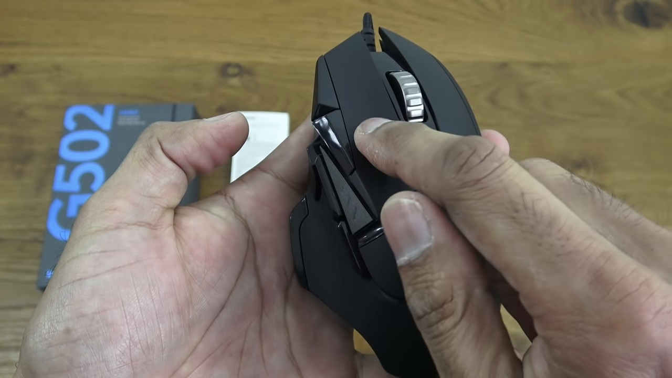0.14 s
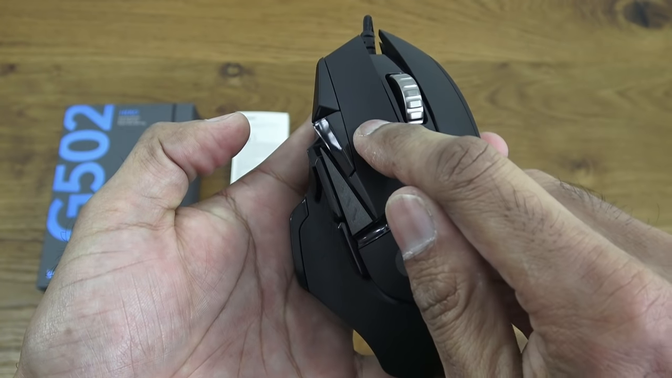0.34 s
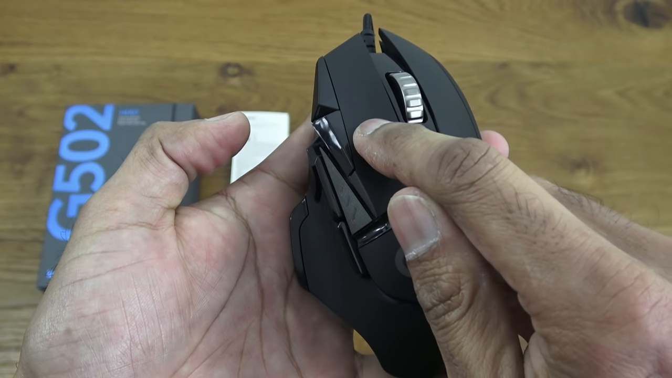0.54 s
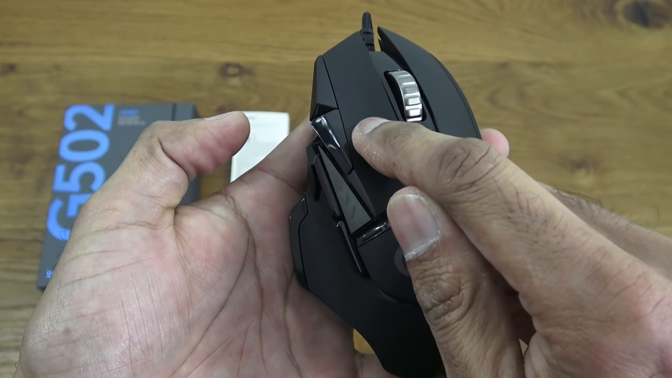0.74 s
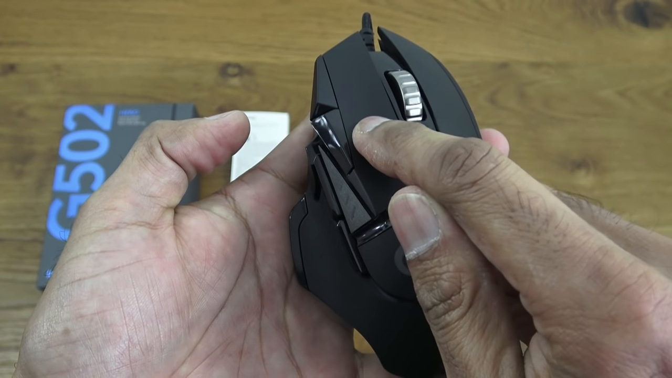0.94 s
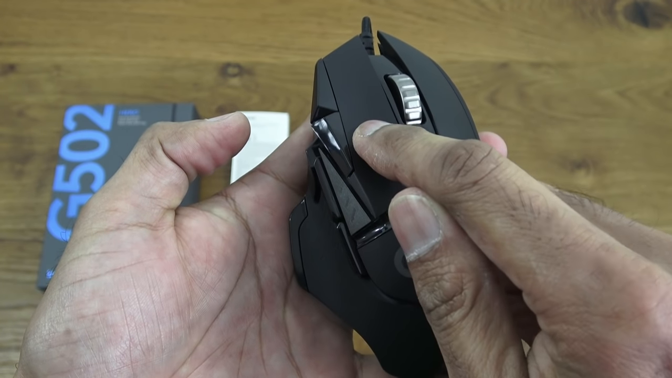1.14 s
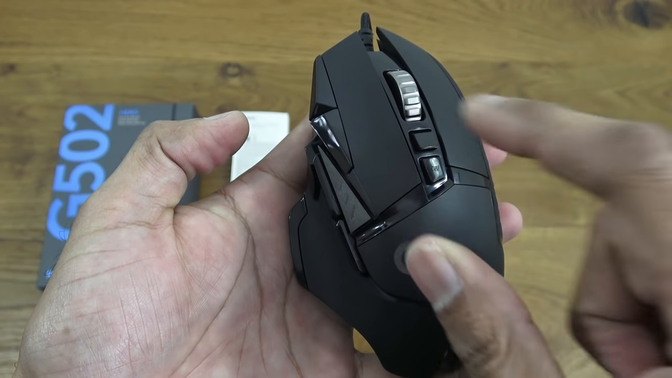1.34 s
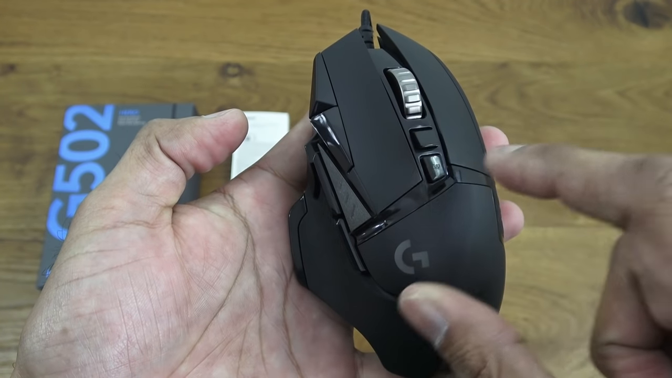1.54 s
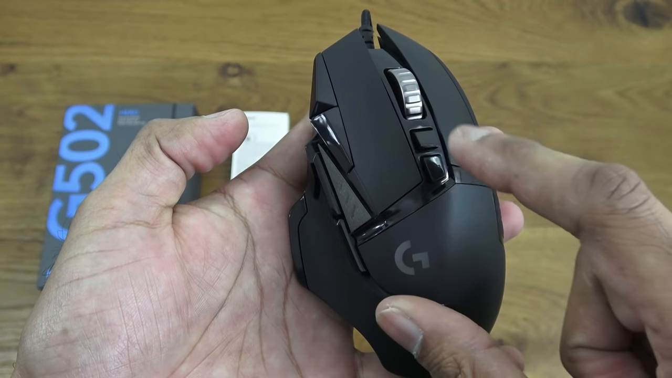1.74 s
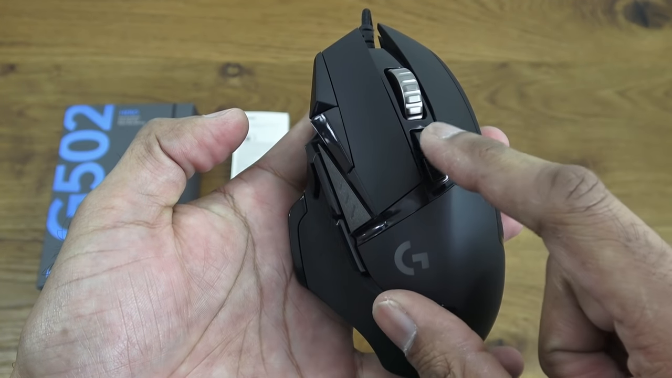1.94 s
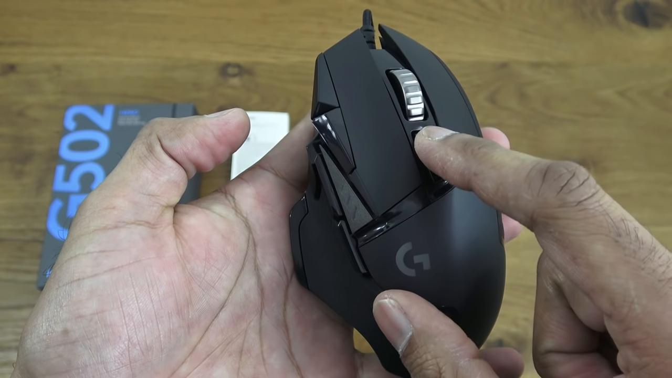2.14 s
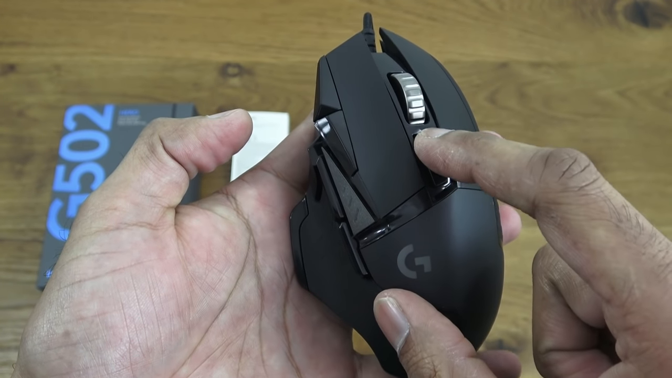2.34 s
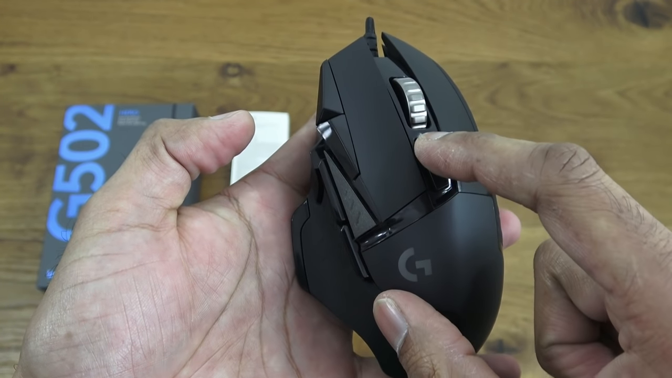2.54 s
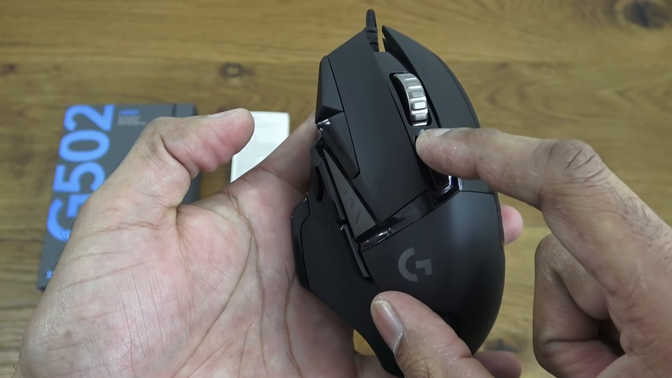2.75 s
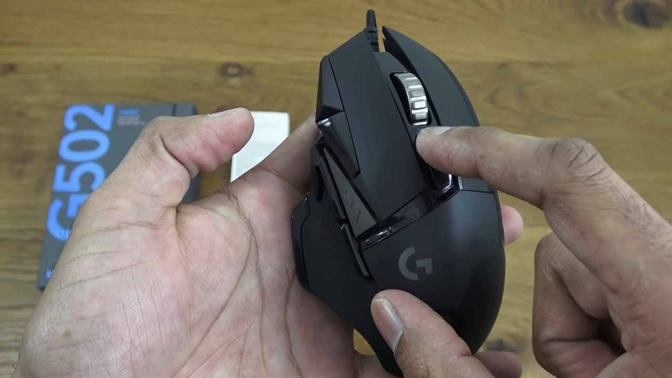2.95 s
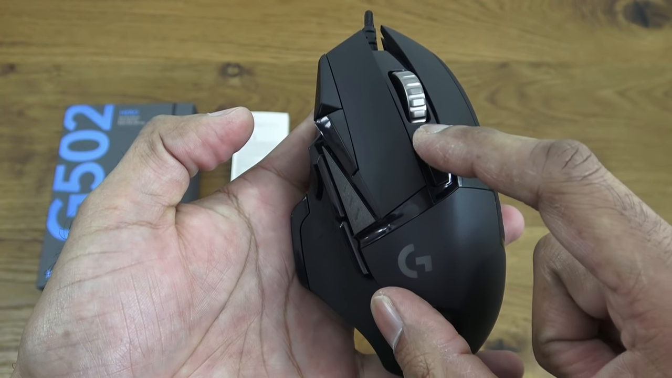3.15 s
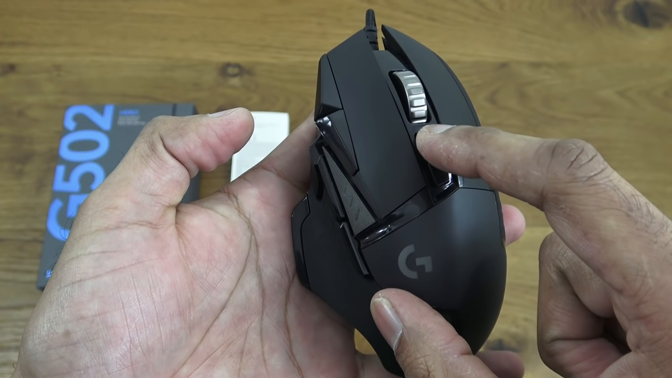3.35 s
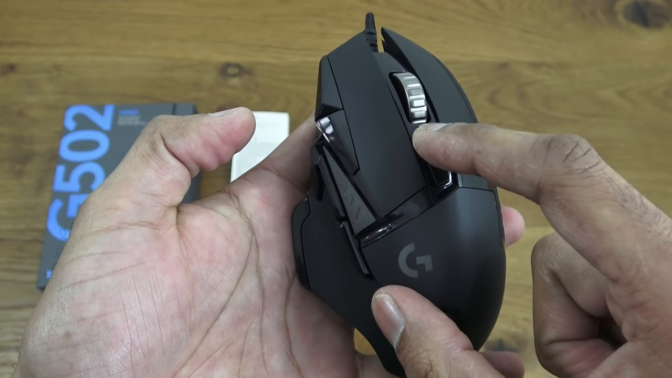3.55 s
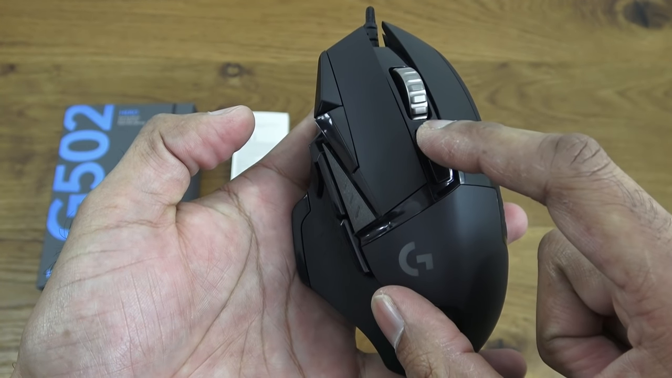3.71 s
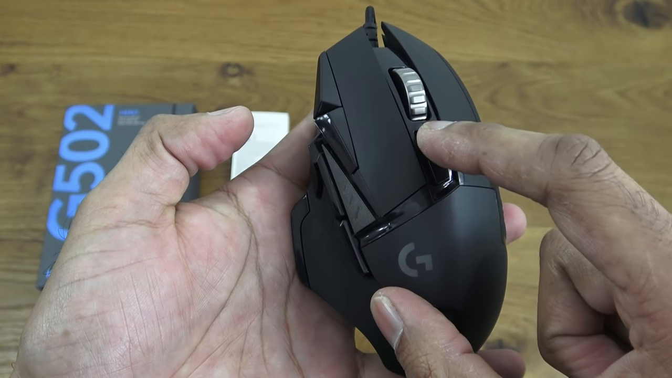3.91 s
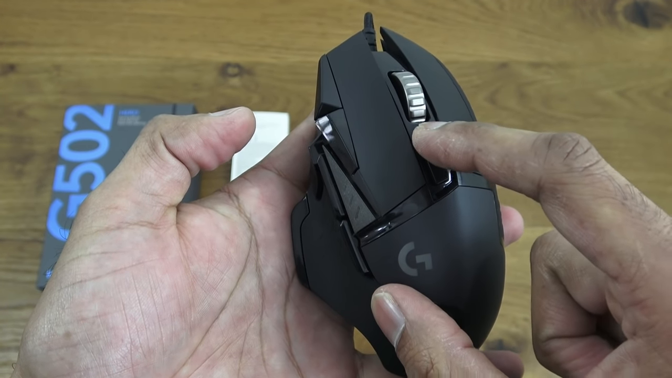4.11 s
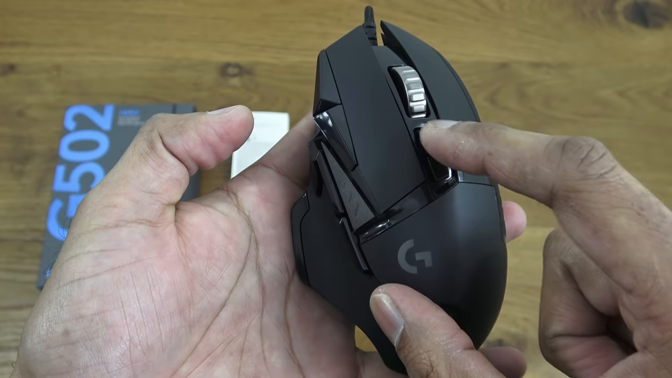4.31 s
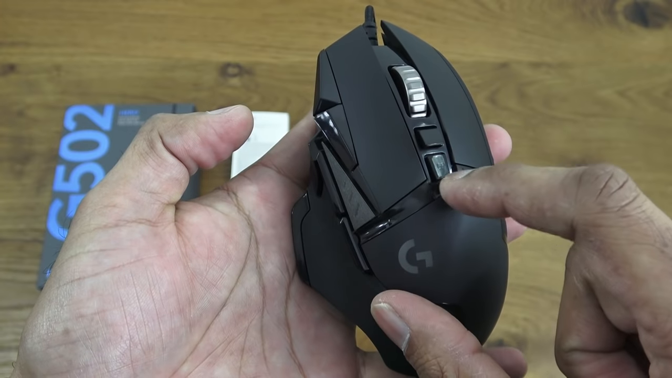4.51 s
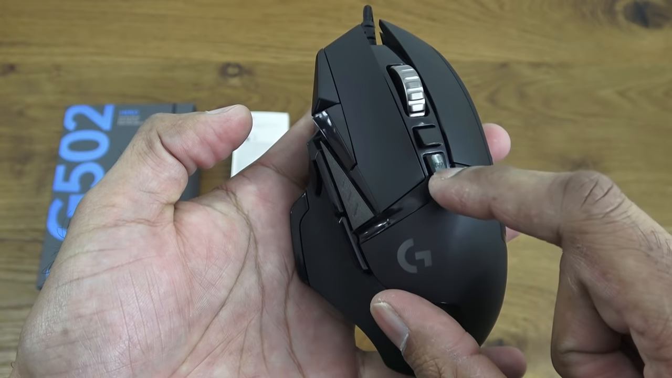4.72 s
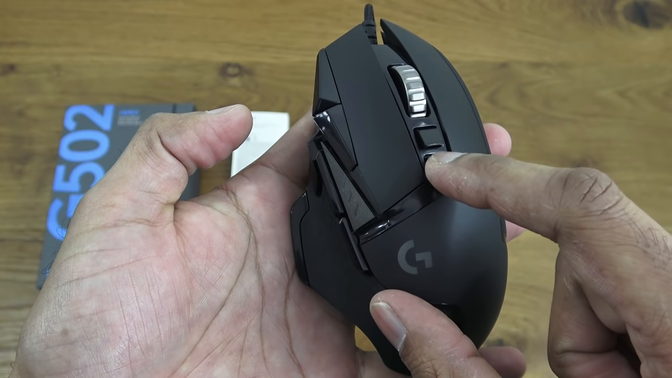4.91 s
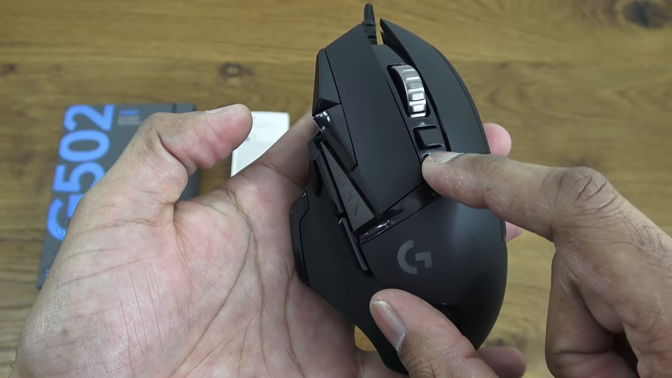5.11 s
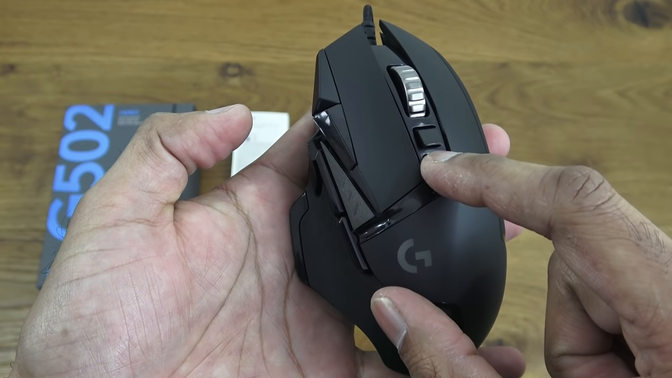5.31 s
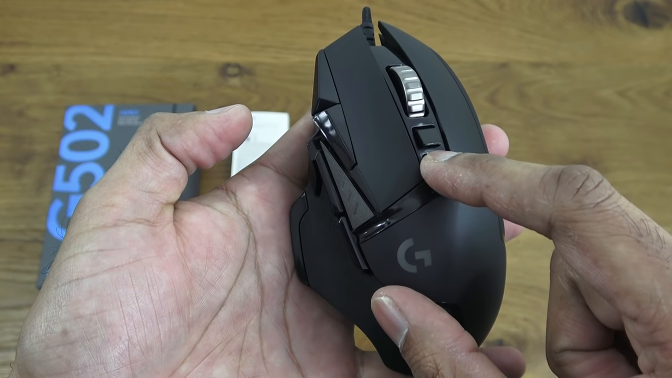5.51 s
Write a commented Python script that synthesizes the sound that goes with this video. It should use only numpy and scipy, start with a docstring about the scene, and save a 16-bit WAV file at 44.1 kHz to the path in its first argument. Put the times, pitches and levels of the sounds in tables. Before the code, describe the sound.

A computer mouse button clicks four times, its wheel latch clacks sharply in and out, and a smaller button ticks once.

```python
"""A computer mouse is held over a wooden desk in a small quiet room, and its buttons are tried one by one.
A fingertip lands, the main button's microswitch ticks down and up four times, and the finger slides off.
Then the stiff latch of the scroll wheel clacks in and out four times, knocking the plastic shell and
ringing a lever and a spring; the freed metal wheel drops onto the lever and rings. Last, a small top
button ticks once. Loose parts tick faintly along the way, over a low rumble and hiss."""
import sys
import numpy as np
from scipy import signal
from scipy.fft import rfft, irfft
from scipy.io import wavfile
from scipy.ndimage import uniform_filter1d

SR = 44100
rng = np.random.default_rng(int(sys.argv[2]) if len(sys.argv) > 2 else 0)


def waveform_to_disk(signal):
    """Save audio, clipped to [-1, 1], as 16-bit WAV at the path in sys.argv[1]."""
    frames = np.transpose(np.atleast_2d(signal))
    scaled = np.clip(frames, -1, 1) * 32767
    samples = np.round(scaled).astype(np.int16)
    wavfile.write(sys.argv[1], SR, samples)


N = 245637
SIZE, LEAD = 8192, 128  # samples in one hit, and how many of them come before the blow
T = (np.arange(SIZE) - LEAD) / SR  # time since the blow, s
AGE = np.maximum(T, 0)
HZ = np.fft.rfftfreq(SIZE, 1 / SR)

# tone colour of each kind of snap, by name: frequency_hz, level_db
SNAP_COLOURS = {"down": [(1200, -31.5), (2500, -34.5), (3400, -21), (4150, -18), (4750, -28), (5400, -13.5),
                (6500, -14.5), (8000, -19), (9000, 1.5), (9600, -3.5), (10300, 2.5), (12100, -22.5),
                (13500, -17), (16000, -33.5)], "up": [(1180, -37), (2000, -34), (2160, -28.5),
                (2980, -32.5), (3740, -18), (5390, -23.5), (6250, -14), (7700, -23), (8330, -9),
                (8850, -13.5), (10000, 1.5), (12400, -22.5), (13200, -19), (16000, -37)],
                "latch": [(1000, -49.5), (1700, -16.5), (2190, -5.5), (2520, -19), (3040, -7.5),
                (3740, -13), (5000, -10), (5440, -15), (5920, -5.5), (7140, -9), (9640, -8.5), (13800, -19),
                (16000, -29.5)], "return": [(1000, -41.5), (1700, -10), (1980, -21.5), (2190, -3),
                (2570, -17.5), (3810, -17), (4640, -11), (5440, -13), (6320, -10.5), (7140, -10.5),
                (8140, -7.5), (11300, -10), (16000, -28.5)], "unlatch": [(1000, -29.5), (1700, -13),
                (2200, -6), (3000, -12), (3500, -6), (4500, -6), (5800, 2), (6500, -6.5), (7700, 3),
                (9300, -2.5), (10500, 3.5), (12600, -2.5), (14000, -6), (16000, -20.5)],
                "small": [(1000, -57), (1700, -24), (1780, -23), (2170, -12), (3340, -12.5), (3950, -7),
                (5600, -14), (8070, 2.5), (8780, -4.5), (11000, 3.5), (13000, -5), (16000, -32)]}
# modes of the metal scroll wheel: pitch_hz, level_db, t60_s
WHEEL_MODES = [(888, 0, .14), (1480, -13, .1), (2228, -2, .07), (2710, -8, .08)]
# modes of the lever that latches the wheel: pitch_hz, level_db, t60_s
LEVER_MODES = [(2215, 0, .026), (2400, -10, .025), (2710, -14, .06), (2968, -13, .04)]


def amp(db):
    return 10 ** (np.asarray(db) / 20)


def unit_rms(x):
    return x / np.sqrt(np.mean(x ** 2) + 1e-20)


def curve(points, hz):
    """Joins (frequency_hz, value) points by straight lines on a log-frequency axis."""
    point_hz, value = np.transpose(points)
    return np.interp(np.log(hz + 1), np.log(point_hz + 1), value)


def add(mix, start_s, hit):
    """Lays a hit into the mix with its blow at start_s."""
    part = mix[:, round(start_s * SR) - LEAD:][:, :SIZE]
    part += hit[..., :part.shape[1]]


def noise(colour):
    """Steady noise of the given colour, rms 1."""
    gain = amp(curve(colour, np.fft.rfftfreq(N, 1 / SR)))
    return unit_rms(irfft(rfft(rng.standard_normal(N)) * gain, N))


def room_tone(level_db=-57):
    """The quiet room rumbles and hisses throughout."""
    # colour of the room tone: frequency_hz, density_db
    colour = [(20, -2), (45, -7), (60, -12.5), (75, -6.5), (105, -19), (160, -20.5), (195, -13.5),
              (235, -23), (310, -22.5), (550, -30), (1100, -31.5), (1900, -37.5), (7500, -39.5),
              (16000, -44)]
    return amp(level_db) * noise(colour)


def ringing(modes, swell_s=0.00037):
    """Modes set going together, each dying at its own speed."""
    ring = sum(amp(db - 60 * AGE / t60) * np.sin(2 * np.pi * hz * AGE) for hz, db, t60 in modes)
    return ring * (1 - np.exp(-(AGE / swell_s) ** 2))


def fingertip():
    """The fingertip lands on the main button with a dull bump."""
    # mode of the bump: pitch_hz, level_db, t60_s
    bump = [(400, 4, 0.026)]
    return amp(-53.5) * ringing(bump)


def body_response(colour):
    """Minimum-phase response of a body of this colour, so it rings only after the blow."""
    log_gain = np.log(amp(curve(colour, HZ)))
    mirrored = np.r_[log_gain, log_gain[-2:0:-1]]
    return np.exp(np.conj(signal.hilbert(mirrored)))[:len(HZ)]


def snap(colour, buzz_s, chatter_s=0.00043, buzz_db=-9):
    """Contacts chatter for a millisecond and the plastic buzzes on. Rows: direct, all-round sound."""
    rise = AGE / chatter_s
    envelope = rise * np.exp(1 - rise) + amp(buzz_db) * (T > 0) * np.exp(-AGE / buzz_s)
    burst = rfft(rng.standard_normal(SIZE) * envelope)
    burst /= np.sqrt(uniform_filter1d(abs(burst) ** 2, size=200))  # the body alone sets the broad colour
    all_round = burst / np.sqrt(abs(burst))  # over all directions the ripples partly even out
    body = body_response(colour)
    fade = np.clip(2 - 4 * AGE / AGE[-1], 0, 1)
    gain = np.sqrt(0.003 * SR / SIZE)  # the energy of 3 ms at rms 1
    return gain * np.array([unit_rms(fade * irfft(path * body)) for path in (burst, all_round)])


def knock(centre_hz, swell_s=0.002766, focus_db=9):
    """The shell swells into its modes; the place of the blow favours those near one pitch."""
    # modes of the plastic shell: pitch_hz, level_db, t60_s
    shell_modes = [(320, -15, 0.034), (747, -6, 0.023), (912, -19.5, 0.086), (1012.7, -5.5, 0.028),
                   (1088, 10.5, 0.018), (1235, -6.5, 0.043), (1425, 10.5, 0.019), (1565, -5.5, 0.011),
                   (2140, -12, .014)]
    hz, db, t60 = np.transpose(shell_modes)[:, :, None]
    place_db = -focus_db * np.minimum(abs(np.log2(hz / centre_hz)) * 2, 1)
    ring = (amp(db + place_db - 60 * AGE / t60) * np.sin(2 * np.pi * hz * (AGE - swell_s))).sum(0)
    ring *= 1 - np.exp(-(AGE / swell_s) ** 2)
    return ring / abs(ring).max()


def room(sound, desk_db, desk_s, spread_s, tail_db):
    """Hand and desk scatter the sound back within milliseconds; then the room dies away band by band."""
    # decay of the room: frequency_hz, t60_s
    decay = [(300, 0.19), (1200, 0.41), (3000, 0.37), (7000, 0.37), (10000, 0.33), (15000, 0.22)]
    # colour of its tail: frequency_hz, level_db
    colour = [(300, -0.5), (1200, -3.5), (3000, -1), (8000, -6), (12000, -2), (16000, -1)]
    direct, all_round = sound
    t = np.arange(SR // 2) / SR
    desk = rng.standard_normal(len(t)) * np.exp(-((t - desk_s) / spread_s) ** 2)
    hz, frame_s, bands = signal.stft(rng.standard_normal(len(t)), SR, nperseg=256)
    bands = bands * amp(curve(colour, hz)[:, None] - 60 * frame_s / curve(decay, hz)[:, None])
    tail = signal.istft(bands, SR, nperseg=256)[1][:len(t)]
    tail *= 1 - np.exp(-(t / 0.0041) ** 2)
    echo = amp(desk_db) * desk / np.linalg.norm(desk) + amp(tail_db) * tail / np.linalg.norm(tail)
    return direct + signal.fftconvolve(all_round, echo)[:N]


def touches(peak_db=13, width_octaves=0.12, firm_db=-52, knock_db_per_db=1.97):
    """The fingertip lands and loose parts tick softly; the firmer a tick, the more the shell knocks."""
    # light touches, as slack is taken up or loose parts settle: start_s, level_db, pitch_hz
    ticks = [(.288, -55, 2500), (1.197, -56.5, 2150), (1.477, -60.5, 6050), (2.599, -58, 4430),
             (2.805, -52.5, 5800), (2.9576, -40.5, 4700), (3.641, -46.5, 4700), (3.709, -59.5, 5200),
             (4.0131, -41.5, 4700)]
    # colour that all these ticks share: frequency_hz, level_db
    tick_colour = [(300, -9.5), (1800, 1), (3500, -8), (7000, -7), (9000, -2.5), (12500, -9.5),
                   (16000, -22)]
    out = np.zeros((2, N))
    add(out, 0.287, fingertip())
    for start_s, level_db, pitch_hz in ticks:
        resonance_db = peak_db * np.exp(-(np.log2((HZ + 1) / pitch_hz) / width_octaves) ** 2)
        colour = np.c_[HZ, curve(tick_colour, HZ) + resonance_db]
        tick = snap(colour, buzz_s=0.012) + amp(-10.5) * ringing(WHEEL_MODES)
        knock_db = firm_db + knock_db_per_db * (level_db - firm_db)
        shell = amp(knock_db) * knock(centre_hz=1150, swell_s=0.00374, focus_db=5.5)
        add(out, start_s, amp(level_db) * tick + shell)
    return room(out, desk_db=-8.5, desk_s=0.0088, spread_s=0.002, tail_db=-7.5)


def main_button(down_db=-32.5, up_db=-28.5, variety_db=-7, buzz_s=0.0019):
    """The microswitch flips on the way down and again on the way up, nearly the same way every time."""
    # clicks of the main button: press_s, release_s
    clicks = [(0.306, 0.4171), (0.5672, 0.6645), (0.8063, 0.8926), (1.0246, 1.1192)]
    out = np.zeros((2, N))
    shell = amp(-59.5) * knock(centre_hz=1150)
    for stroke, snap_db, starts in zip(("down", "up"), (down_db, up_db), np.transpose(clicks)):
        usual = snap(SNAP_COLOURS[stroke], buzz_s)
        for start_s in starts:
            variation = amp(variety_db) * snap(SNAP_COLOURS[stroke], buzz_s)
            add(out, start_s, amp(snap_db) * (usual + variation) + shell)
    return room(out, desk_db=0.5, desk_s=0.0037, spread_s=0.0073, tail_db=-3.5)


def finger_slide(start_s=1.206, rise_s=0.1, hold_s=0.074, fall_s=0.2, level_db=-63):
    """Skin hisses over the matt plastic as the finger leaves the button."""
    # colour of the skin's hiss: frequency_hz, level_db
    skin_colour = [(2000, -7.5), (6000, -12), (9000, 0), (10500, 1), (13000, -6), (16000, -26)]
    corners_s = start_s + np.cumsum([0, rise_s, hold_s, fall_s])
    swell = np.interp(np.arange(N) / SR, corners_s, [0, 1, 1, 0])
    return amp(level_db) * noise(skin_colour) * swell


def spring(pitch_hz, width_hz=280, t60_s=0.088):
    """A small coiled spring rattles in a dense cluster of modes."""
    cluster = irfft(rfft(rng.standard_normal(SIZE)) * np.exp(-((HZ - pitch_hz) / width_hz) ** 2))
    return unit_rms(cluster) * (T > 0) * amp(-60 * AGE / t60_s)


def wheel_latch(knock_db_per_db=1.97):
    """Each stroke snaps, knocks the shell, and sets the lever and a spring ringing."""
    # the latch's four strokes, by name: snap_colour, snap_db, knock_db, centre_hz, lever_db, spring_db
    strokes = {"lock": ("latch", -21, -14.5, 1070, -27.5, -34.5),
               "rest": ("return", -23.5, -19, 1175, -30, -32.5),
               "free": ("latch", -20.5, -18, 1125, -19.5, -46.5),
               "spring back": ("unlatch", -16.5, -18, 1320, -30.5, -28.5)}
    # resonances of the spring, by name (which one sings depends on how it is bent): pitch_hz
    spring_hz = {"low": 6330, "middle": 7450, "high": 8100, "bright": 9800, "top": 11600}
    # clacks of the latch: start_s, stroke, strength_db, resonance
    cues = [(2.4590, "lock", 1, "bright"), (2.8443, "rest", -1.4, "low"), (3.0207, "free", 0.15, "low"),
            (3.2132, "spring back", .2, "middle"), (3.483, "lock", 1, "high"),
            (3.8355, "rest", 0.53, "high"), (4.0655, "free", 1.34, "bright"),
            (4.2677, "spring back", 0.5, "top")]
    clacks, knocks = np.zeros((2, 2, N))
    slot_gain = amp([[0], [-3]])  # the lever sounds through the wheel slot, mostly towards the listener
    for start_s, stroke, strength_db, resonance in cues:
        snap_colour, snap_db, knock_db, centre_hz, lever_db, spring_db = strokes[stroke]
        click = amp(snap_db) * snap(SNAP_COLOURS[snap_colour], buzz_s=0.0083)
        lever = amp(lever_db) * slot_gain * ringing(LEVER_MODES)
        rattle = amp(spring_db) * spring(spring_hz[resonance])
        add(clacks, start_s, amp(strength_db) * (click + lever + rattle))
        shell = amp(knock_db + knock_db_per_db * strength_db) * knock(centre_hz, focus_db=10)
        add(knocks, start_s, shell)
    # the shell's knocks stay short and tight, with little desk echo
    return (room(clacks, desk_db=-12.5, desk_s=0.0033, spread_s=0.0054, tail_db=-9)
            + room(knocks, desk_db=-15.5, desk_s=0.007, spread_s=0.009, tail_db=-10.5))


def wheel_drop(start_s=4.3329):
    """Unlatched, the metal wheel falls back on its lever: both ring and the shell knocks."""
    out = np.zeros((2, N))
    metal = amp(-38.5) * ringing(WHEEL_MODES) + amp(-41) * ringing(LEVER_MODES)
    add(out, start_s, metal + amp(-32) * knock(centre_hz=950))
    return room(out, desk_db=-5, desk_s=0.0077, spread_s=0.0014, tail_db=-9.5)


def small_button(start_s=5.2933):
    """A lighter switch behind the wheel ticks, and its metal leaf rings on."""
    # modes of the metal leaf: pitch_hz, level_db, t60_s
    leaf_modes = [(3630, -14, 0.18), (8340, -6, 0.24), (10700, -2, 0.078), (13100, -14, .07)]
    out = np.zeros((2, N))
    click = amp(-33.5) * snap(SNAP_COLOURS["small"], buzz_s=0.0064)
    shell = amp(-47) * knock(centre_hz=1066)
    add(out, start_s, click + shell + amp(-48.5) * ringing(leaf_modes))
    return room(out, desk_db=-4, desk_s=0.0043, spread_s=0.0027, tail_db=-8)


def scene():
    """The mouse and the finger over the room tone, in mono."""
    mouse = main_button() + wheel_latch() + wheel_drop() + small_button() + touches()
    return (mouse + finger_slide() + room_tone())[None]


def record(dry):
    """A steep low-pass trims the very top of the treble."""
    low_pass = signal.firwin(255, cutoff=16000, window=("kaiser", 8), fs=SR)
    return signal.oaconvolve(dry, low_pass[None], "same")


dry = scene()
out = record(dry)
waveform_to_disk(out)
```